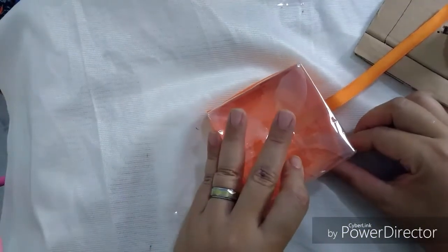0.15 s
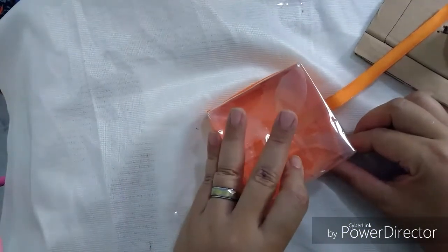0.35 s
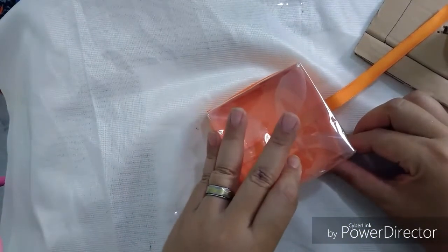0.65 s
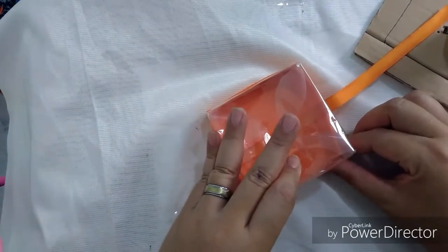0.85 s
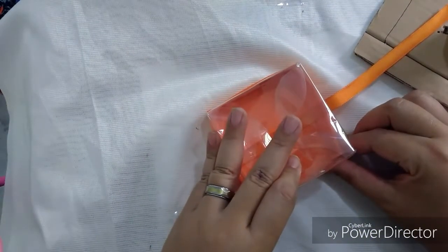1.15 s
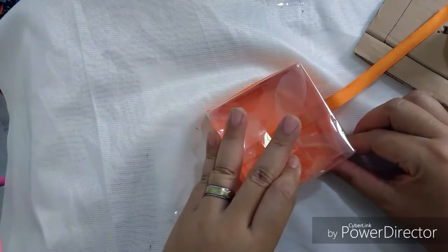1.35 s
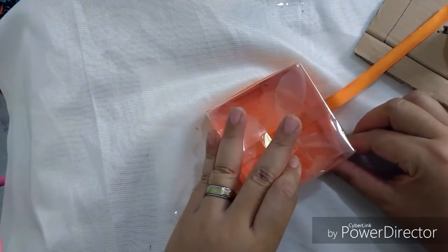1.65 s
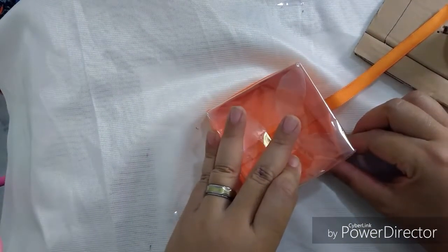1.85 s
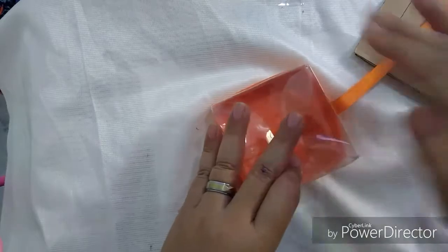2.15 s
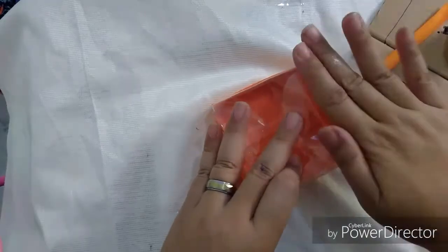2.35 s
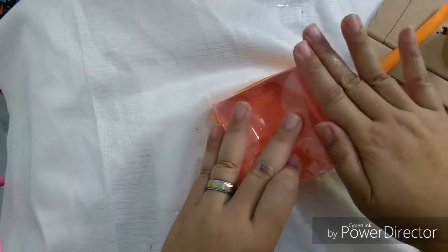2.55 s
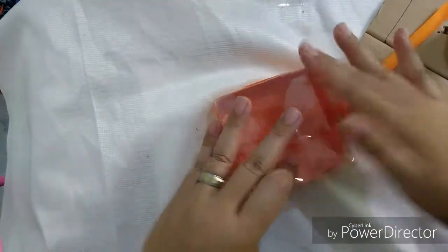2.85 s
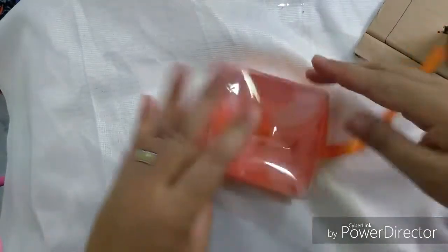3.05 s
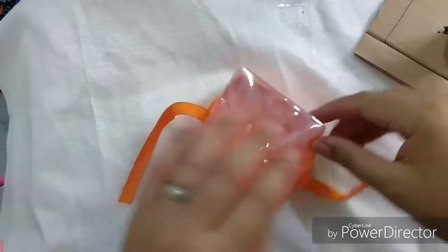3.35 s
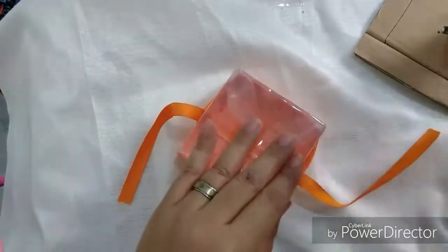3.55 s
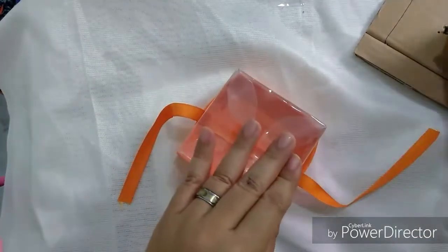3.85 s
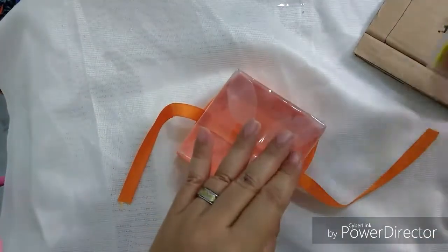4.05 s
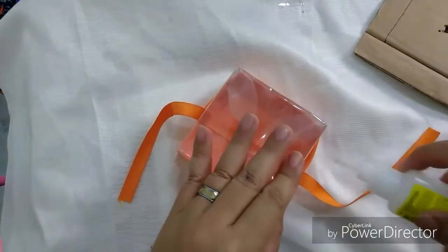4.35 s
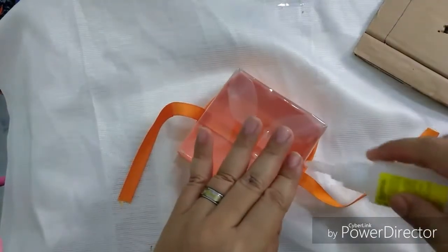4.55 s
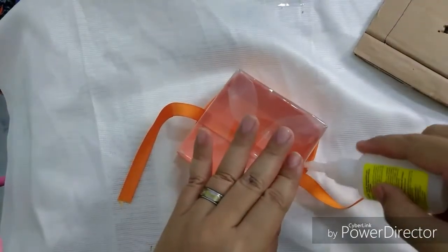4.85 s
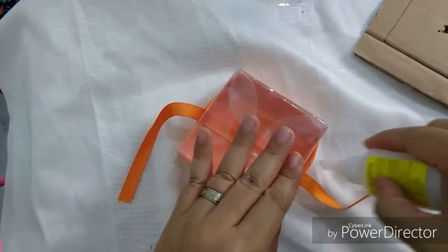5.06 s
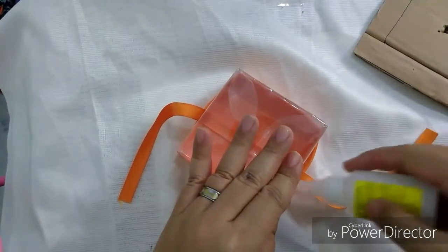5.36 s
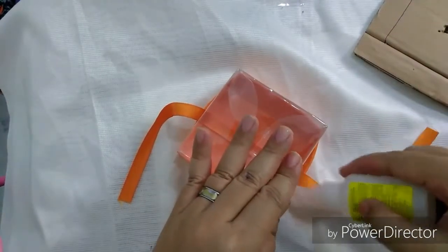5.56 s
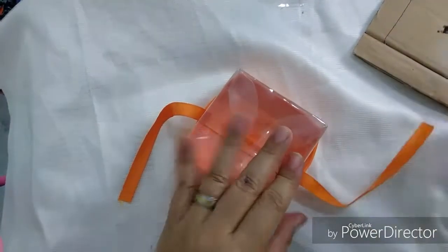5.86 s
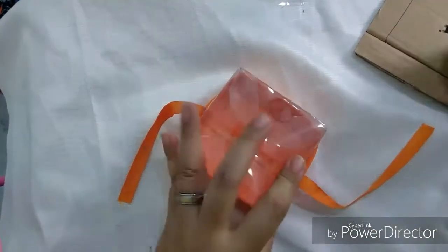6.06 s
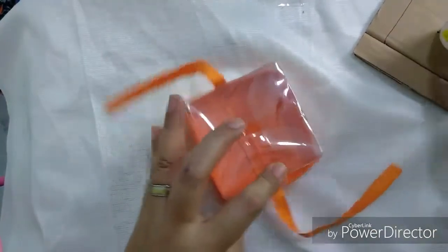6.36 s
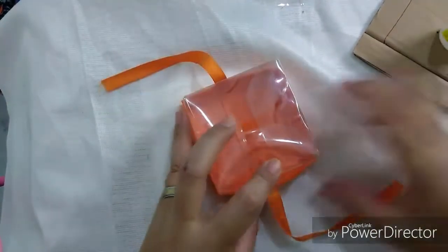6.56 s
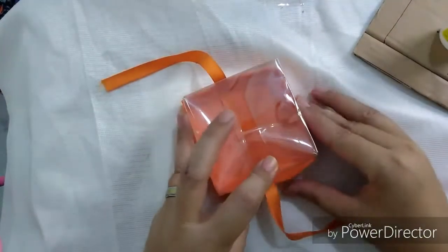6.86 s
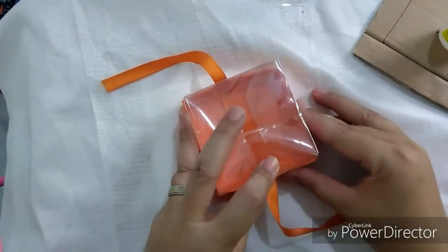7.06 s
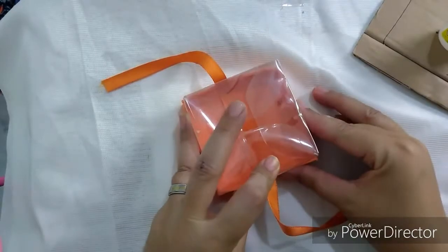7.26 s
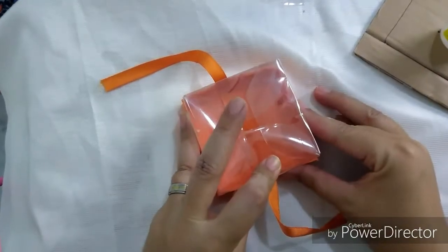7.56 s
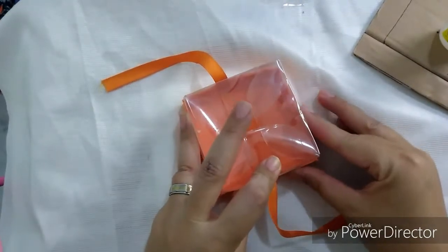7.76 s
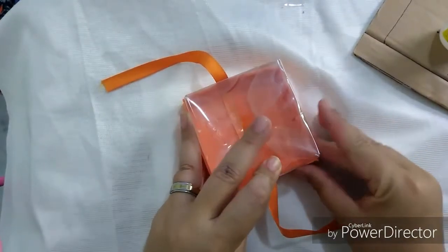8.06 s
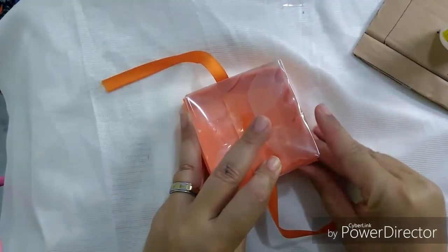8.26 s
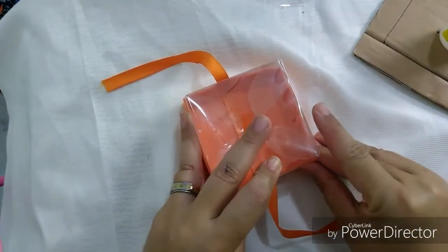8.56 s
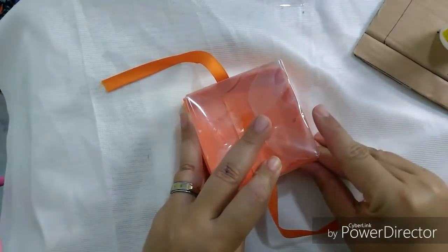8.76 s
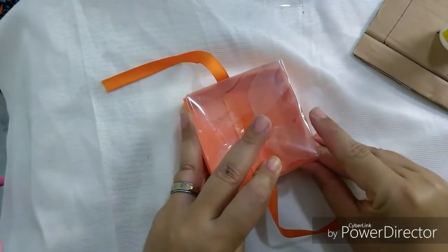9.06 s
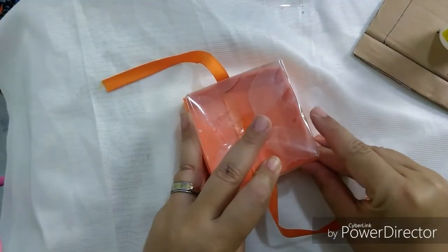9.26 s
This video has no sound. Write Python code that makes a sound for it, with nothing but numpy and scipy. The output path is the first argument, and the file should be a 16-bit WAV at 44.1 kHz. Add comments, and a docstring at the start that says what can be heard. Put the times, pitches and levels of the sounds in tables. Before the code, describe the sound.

Sharp hollow plastic pops and small crease ticks between brief hand rubs, over low room air and an engine drone swelling late.

```python
"""A thin plastic box is pressed, turned and glued on a cloth-covered table in a quiet room.
Throughout, noise makes the air, a steady tone an appliance, multiples of a firing rate an engine outside.
From the start, hands and ribbon rub as slips through resonators, walls pop as decaying modes and creases
tick as noise bursts; the hardest pops come from 2.5 to 4.4 s and at 7.8 s. Gliding noise swishes at 7.2
and 8.4 s, and the engine swells near the end. Two close capsules feed a stereo widener."""
import sys
import numpy as np
from scipy import signal
from scipy.fft import rfft, irfft, next_fast_len
from scipy.io import wavfile

SR = 44100
rng = np.random.default_rng(int(sys.argv[2]) if len(sys.argv) > 2 else 0)


def generate_wav(signal):
    """Clip the signal to [-1, 1] and save it as 16-bit WAV at the path in sys.argv[1]."""
    frames = np.transpose(np.atleast_2d(signal))
    scaled = np.clip(frames, -1, 1) * 32767
    pcm = np.round(scaled).astype(np.int16)
    wavfile.write(sys.argv[1], SR, pcm)


N = 414977


def from_db(db):
    """Turns dB into a gain."""
    return 10 ** (np.asarray(db) / 20)


def rms_one(x):
    """Scales a signal to an rms of 1."""
    return x / np.sqrt(np.mean(x ** 2) + 1e-20)


def in_time(rows):
    """Joins the rows of a timed table by lines, one curve per column."""
    s, *columns = np.transpose(rows)
    return [np.interp(np.arange(N) / SR, s, column) for column in columns]


def at_hz(points, hz):
    """Reads a curve over frequency, joined by lines on a log pitch axis."""
    points = np.array(points)
    return np.interp(np.log(hz + 1), np.log(points[:, 0]), points[:, 1])


def drift(rate):
    """Slow chance: random points of spread 1, joined by lines, `rate` points per second."""
    points = rng.standard_normal(4000)
    return np.interp(np.arange(N) * rate / SR, np.arange(len(points)), points)


def add(out, sound, s):
    """Mixes a stereo sound in at s seconds, cut off at the end of the scene."""
    at = round(s * SR)
    out[:, at:at + sound.shape[1]] += sound[:, :N - at]


# Stereo width of spread-out sound. Each row: frequency in Hz, side minus mid in dB.
SIDE_WIDTH = [(40, -7.5), (150, -7.5), (500, -4.5), (780, -6), (1200, 0.5), (16000, -0.5)]


def spread(mid, side, spectrum):
    """Colours two unrelated signals as mid and side of a stereo pair, with the mid at rms 1."""
    size = next_fast_len(len(mid))
    hz = np.arange(size // 2 + 1) * SR / size
    colour = from_db(at_hz(spectrum, hz))
    side_colour = colour * from_db(at_hz(SIDE_WIDTH, hz))
    mid = irfft(rfft(mid, size) * colour, size)[:len(mid)]
    side = irfft(rfft(side, size) * side_colour, size)[:len(mid)]
    return np.array([mid + side, mid - side]) / np.sqrt(np.mean(mid ** 2))


def uneven_slips(grain_db, lumps_db, lumps_per_s):
    """Dense slips of uneven size, coming in lumps, as two unrelated signals."""
    grain = grain_db * np.minimum(rng.exponential(1, N), 5)
    lumps = lumps_db * drift(lumps_per_s)
    return rng.standard_normal((2, N)) * from_db(grain + lumps)


# Colour of the room air. Each row: frequency in Hz, relative density in dB per Hz.
AIR_COLOUR = [(25, -9), (150, 1), (250, -1), (400, -9.5), (750, -17.5), (1600, -29.5), (3300, -32.5),
              (7000, -40), (8800, -34), (10000, -38.5), (16000, -37)]
AIR_DB = -48


def room_air():
    """The quiet room's air is low-heavy wide noise whose level wanders slowly."""
    noise = uneven_slips(grain_db=0.9, lumps_db=2.0, lumps_per_s=3.6)
    return from_db(AIR_DB) * spread(*noise, AIR_COLOUR)


# Firing rate of the engine outside. Each row: time in seconds, rate in Hz.
FIRING_RATE = [(0, 63.15), (4.3, 62.7), (7.6, 62.1), (9.41, 60.2)]
# Engine loudness. Each row: time in seconds, drone in dB, third multiple in dB.
ENGINE_LEVELS = [(0, -43.5, -77), (1.7, -57, -74), (4.01, -44.5, -58), (4.2, -58, -56), (4.37, -42.5, -57),
                 (5.2, -36.5, -59), (5.38, -47, -59), (5.57, -40.5, -55), (6.1, -43, -51),
                 (6.5, -32.5, -51), (6.73, -45.5, -50.5), (6.92, -35, -57), (7.16, -32, -50),
                 (7.51, -29, -42), (7.75, -41.5, -56), (8.07, -41, -49), (8.28, -28, -40.5),
                 (8.45, -25, -54), (8.8, -21.5, -34.5), (9.08, -27, -42.5), (9.25, -32, -37),
                 (9.41, -26, -37.5)]
# Make-up of the drone. Each row: multiple of the firing rate, level relative to the drone in dB.
DRONE_MULTIPLES = [(1, -0.5), (2, -24.5), (4, -34)]


def engine():
    """Low multiples of the firing rate come through the walls; the third swells on its own."""
    (rate_hz,) = in_time(FIRING_RATE)
    drone_db, third_db = in_time(ENGINE_LEVELS)
    turn = 2 * np.pi * np.cumsum(rate_hz) / SR
    drone = sum(from_db(drone_db + level_db) * np.sin(k * turn) for k, level_db in DRONE_MULTIPLES)
    third = from_db(third_db) * np.sin(3 * turn)
    # the drone leans left, the third multiple right
    return np.sqrt(2) * (drone * from_db([[.6], [-.6]]) + third * from_db([[-1.2], [1.2]]))


# Appliance hum. Each row: frequency in Hz, rms level in dB before waver and lean.
HUM_TONES = [(240, -49)]


def hum(waver_db=0.5, lean_db=0.8):
    """The appliance holds a steady pitch, wavering a little in level and leaning left."""
    t = np.arange(N) / SR
    tones = 0
    for hz, level_db in HUM_TONES:
        tones = tones + from_db(level_db + waver_db * drift(2)) * np.sin(2 * np.pi * hz * t)
    return np.sqrt(2) * tones * from_db([[lean_db], [-lean_db]])


def swell(s, hold_s, rise_db, fade_db):
    """Level in dB at every millisecond: rises to 0, holds and fades, both slopes in dB per second."""
    t = np.arange(0, N / SR + 1, .001) - s
    return rise_db * np.minimum(t, 0) - fade_db * np.maximum(t - hold_s, 0)


def per_sample(gain):
    """Joins a gain given at every millisecond by lines."""
    return np.interp(np.arange(N) / SR * 1000, np.arange(len(gain)), gain)


# Strokes of hands, box and ribbon on cloth. Each row: full pressure from in seconds, hold in seconds,
# hiss in dB, hollow murmur in dB, rise in dB per second, fade in dB per second.
RUBS = [(.04, 0.19, -74, -54.5, 214.5, 88), (.46, 0.2, -81, -54, 159, 70),
        (1.96, 0.018, -56, -46.5, 182, 86), (2.05, 0.011, -49.5, -51, 190, 197),
        (2.862, 0.08, -48.5, -43, 333, 150), (3.029, 0.023, -38.5, -34.5, 361, 226),
        (3.179, 0.015, -40.5, -45, 228, 278), (3.331, 0.023, -46.5, -44, 190, 216),
        (3.451, 0.092, -55.5, -45, 403, 179), (3.76, 0.0091, -49.5, -42, 900, 130),
        (3.88, 0.059, -58.5, -56.5, 300, 82), (4.085, 0.073, -54.5, -46, 901.5, 93),
        (5.1, 0.012, -59, -46.5, 452, 297), (5.62, 0.018, -64, -44.5, 328, 300),
        (5.72, 0.012, -56, -37.5, 400, 330), (5.884, 0.0084, -57, -47, 600, 200),
        (6.02, 0.12, -58.5, -54, 300, 150), (6.14, 0.053, -49, -47, 400, 100),
        (6.27, 0.16, -43, -44, 247, 243), (6.54, 0.028, -52.5, -45.5, 402, 330),
        (6.699, 0.036, -66, -54, 500, 150), (6.88, 0.013, -59.5, -46.5, 300, 160),
        (6.97, .26, -66.5, -50.5, 300, 54), (7.768, 0.082, -54, -37.5, 700, 151),
        (8.29, 0.17, -60, -50, 168, 82)]
RESTING_HISS_DB, RESTING_MURMUR_DB = -69.5, -70.5   # hands lying on the box


def strokes():
    """Each stroke raises hiss and murmur gains together above their resting levels."""
    gains = from_db([[RESTING_HISS_DB], [RESTING_MURMUR_DB]])
    for s, hold_s, hiss_db, murmur_db, rise_db, fade_db in RUBS:
        stroke_db = swell(s, hold_s, rise_db, fade_db) + [[hiss_db], [murmur_db]]
        gains = np.hypot(gains, from_db(stroke_db))     # powers add
    return map(per_sample, gains)


def patchy(spectrum, slips_per_s, patch_db, patches_per_s, **unevenness):
    """Separate slips, each ringing one of many small resonances that come and go as the grip shifts."""
    slips = uneven_slips(**unevenness)
    low_hz, high_hz = spectrum[0][0], spectrum[-1][0]
    pitches = 2 ** np.arange(np.log2(low_hz), np.log2(high_hz) + .2, 1 / 3)     # third octaves
    # each sample is dealt to one resonance; numbers past the last stay silent
    dealt = (rng.random(N) * SR / slips_per_s * len(pitches)).astype(int)
    out = 0
    for k, hz in enumerate(pitches):
        r = np.exp(-np.pi * hz / 4 / SR)    # bandwidth is a quarter of the pitch
        excitation = slips * (dealt == k) * from_db(patch_db * drift(patches_per_s)) + 1e-18
        feedback = [1, -2 * r * np.cos(2 * np.pi * hz / SR), r * r]
        out = out + signal.lfilter([1 - r * r, 0, r * r - 1], feedback, excitation)
    return spread(*out, spectrum)


# Colour of skin and ribbon hissing on cloth. Each row: frequency in Hz, relative density in dB per Hz.
HISS_COLOUR = [(500, -26), (1200, -4.5), (2300, 1.5), (3300, -3), (5000, -5.5), (7000, -10.5), (9000, -9),
               (12000, -8), (15500, -13)]


def rubbing_hiss():
    """Fine, dense slips make the bright side of rubbing."""
    return patchy(HISS_COLOUR, slips_per_s=36000, patch_db=2.0, patches_per_s=32,
                  grain_db=1.0, lumps_db=0.7, lumps_per_s=79)


# Colour of the hollow inside under rubbing. Each row: frequency in Hz, relative density in dB per Hz.
HOLLOW_COLOUR = [(150, -14), (400, 1), (600, -4), (780, 5.5), (1050, -1.5), (1500, -20), (2500, -20)]


def hollow_murmur():
    """Sparser, lumpier slips murmur in the hollow of the box."""
    return patchy(HOLLOW_COLOUR, slips_per_s=8000, patch_db=3.0, patches_per_s=27,
                  grain_db=1.8, lumps_db=3.0, lumps_per_s=70)


# Walls buckling or knocked. Each row: start in seconds, level in dB, hollow pitch in Hz,
# table thud relative to that level in dB, length of the push in seconds.
WALL_POPS = [(0.081, -37, 896, 6, 0.0025), (1.139, -44, 780, -14, 0.0027), (1.946, -30, 845, -19, 0.0041),
             (1.959, -22.5, 860, -4, 0.0012), (1.978, -32, 807, -30, 0.0018),
             (2.051, -35.5, 920, -9, 0.0018), (2.299, -22, 790, -24, 0.0018),
             (2.509, -7.5, 739, -17.5, 0.0018), (2.513, -15, 900, -11.5, 0.0013),
             (2.6027, -5, 781, -23, 0.0042), (2.603, -15.5, 444, -28, .003), (2.921, -27, 870, -16, 0.0083),
             (2.926, -21.5, 475, -17, 0.0052), (3.023, -18, 752, -11.5, 0.0059),
             (3.036, -18.5, 840, -20, 0.0018), (3.039, -22, 920, -17, 0.0022),
             (3.464, -23, 942, -6, 0.0057), (3.503, -24.5, 673, -6, 0.0065), (3.736, -13, 777, -28, 0.0047),
             (3.747, -11, 757, -3, 0.0041), (4.069, -9.5, 930, -12, 0.0022),
             (4.072, -14.5, 720, -15.5, 0.0015), (4.083, -25.5, 1060, -11, 0.0021),
             (4.369, -17.5, 780, -9, 0.0024), (4.411, -21.5, 781, -15, 0.007),
             (4.618, -26, 810, -28, 0.0031), (4.688, -36, 760, -24, 0.0021),
             (4.735, -39.5, 756, -11, 0.0031), (5.107, -34.5, 810, -16, 0.0025),
             (5.405, -24, 805, -31, 0.0027), (5.628, -30, 743, -25, 0.0063),
             (5.712, -27.5, 785, -5, 0.0025), (5.721, -22, 924, 4, 0.0036), (5.887, -36, 745, -18, 0.0033),
             (6.006, -23, 743, -2, 0.0017), (6.212, -36.5, 1000, 5, 0.0017), (6.308, -37, 973, -14, 0.0092),
             (6.406, -29, 764, -20, 0.0052), (6.667, -30, 716, 1, 0.0072), (6.983, -38, 800, -20, 0.0054),
             (7.037, -38, 850, -14, 0.011), (7.079, -32, 884, -9, 0.011), (7.225, -33, 1106, -23, 0.0091),
             (7.746, -25.5, 790, -29, 0.002), (7.805, -4.5, 794, -30, .0015)]
# Modes of the box. Each row: ratio to the hollow pitch, relative level in dB, share of the ring's T60.
BOX_MODES = [(1, 0.5, 1), (1.176, -7, 0.4), (0.6, -10.5, 0.62), (0.454, -18.5, 1), (1.56, -21.5, 0.13),
             (2.317, -26.5, 0.81), (2.62, -24, 0.14)]
RING_T60_S = 0.017


def pops(lag_s=.00008, thud_hz=190, thud_t60=0.019, chance_db=3.0, detune=0.039, lean_db=-1.8):
    """A push rings the box's modes, bent differently each time, and thuds into the table."""
    out = np.zeros((2, N))
    luck = rng.standard_normal((len(WALL_POPS), len(BOX_MODES), 2))
    t = np.maximum(np.arange(4000) / SR - np.array([[0], [lag_s]]), 0)     # right capsule hears it later
    for (s, level_db, hz, thud_db, push_s), row in zip(WALL_POPS, luck):
        free = np.maximum(t - push_s, 0)      # the ring grows under the push and dies after it
        ring = from_db(thud_db - 60 * free / thud_t60) * np.sin(2 * np.pi * thud_hz * t)
        for (ratio, mode_db, share), (chance, bend) in zip(BOX_MODES, row):
            varies = ratio != 1               # the main mode keeps its pitch and level
            decay_db = 60 * free / (RING_T60_S * share)
            gain = from_db(mode_db + chance_db * chance * varies - decay_db)
            mode_hz = hz * ratio * (1 + detune * bend * varies)
            ring = ring + gain * np.sin(2 * np.pi * mode_hz * t)
        push = np.sin(np.pi / 2 * np.minimum(t / push_s, 1))
        add(out, from_db(level_db) * push * ring * from_db([[lean_db], [-lean_db]]), s)
    return out


# Creases and ribbon ticking. Each row: start in seconds, level in dB, dullness in dB per octave.
CREASE_TICKS = [(0.0826, -32.5, 8), (0.169, -39.5, -1), (1.862, -49.5, 11), (1.976, -29, 4),
                (2.051, -30, 3), (2.2956, -29, 6.5), (2.919, -24.5, 4.5), (2.968, -36, 2),
                (3.026, -19.5, 6.5), (3.466, -25, 4.5), (3.745, -19, 6), (3.881, -33, 4.5),
                (4.07, -29.5, 13.5), (4.152, -35.5, -9), (4.41, -42, 9.5), (5.097, -39, 4),
                (5.6272, -39.5, 6), (5.723, -25.5, 3.5), (5.902, -33.5, -11), (5.935, -35.5, 0),
                (5.971, -37, -2), (6.0042, -27.5, 6), (6.1299, -33, 6), (6.53, -37, 5), (6.847, -37, -11),
                (6.93, -32, -11), (7.117, -41.5, 8.5), (7.19, -50.5, 11.5), (7.806, -38.5, 14),
                (8.302, -35.5, -3)]
TICK_T60_S, TICK_RISE_S = 0.022, 0.0025     # T60 at zero dullness
DULL_DB_DOUBLES_TICK = 18.5                 # duller ticks last longer


def ticks():
    """Each tick is a burst of tiny slips that dies at once, tilted by its dullness."""
    out = np.zeros((2, N))
    t = np.arange(2048) / SR
    noise = rng.standard_normal((len(CREASE_TICKS), 2, len(t)))
    hz = np.arange(len(t) + 1) * SR / 2 / len(t)
    low_cut_db = 8.1 * np.log2(np.maximum(1500 / (hz + 1), 1))
    for (s, level_db, dull_db), burst in zip(CREASE_TICKS, noise):
        tilt_db = dull_db * np.log2(np.maximum(hz, 1500) / 6000)
        burst = irfft(rfft(burst, 2 * len(t)) * from_db(-tilt_db - low_cut_db))[:, :len(t)]
        t60_s = TICK_T60_S * 2 ** (dull_db / DULL_DB_DOUBLES_TICK)
        rise = np.minimum(t / TICK_RISE_S, 1)
        add(out, from_db(level_db - 60 * t / t60_s) * rise * burst, s)
    return out


# Decay of the room. Each row: frequency in Hz, T60 in seconds.
ROOM_DECAY = [(100, 0.23), (800, 0.43), (12000, 0.27)]
# Colour of the echoes. Each row: frequency in Hz, relative level in dB.
ECHO_COLOUR = [(450, -0.5), (780, -9.5), (1100, 3), (1600, -1.5), (4000, 0.5)]
ROOM_DB, ROOM_GAP_S = -7.5, 0.0045      # echoes fade in around the end of the gap


def room(x):
    """Echoes are noise that dies octave by octave, after a short gap."""
    t = np.arange(SR // 2) / SR
    white, tail = rng.standard_normal((2, len(t))), 0
    for hz in 90 * 2. ** np.arange(8):
        band = signal.butter(2, [hz / np.sqrt(2), hz * np.sqrt(2)], "band", fs=SR, output="sos")
        tail = tail + signal.sosfilt(band, white) * from_db(-60 * t / at_hz(ROOM_DECAY, hz))
    tail = tail * np.clip(t / ROOM_GAP_S - .5, 0, 1)
    tail = spread(*tail, ECHO_COLOUR) / np.sqrt(len(t))
    return signal.fftconvolve(tail, x.mean(axis=0, keepdims=True))[:, :N]


# Skin sliding with a narrow swish. Each row: loudest at in seconds, level there in dB, centre there in Hz,
# glide in Hz per second, rise in dB per second, fade in dB per second.
SKIN_SWISHES = [(7.262, -47, 1170, 300, 300, 280), (7.229, -46, 2630, 1, 600, 248),
                (7.24, -54, 4576, -2, 500, 200), (8.371, -55, 1750, -3000, 500, 150),
                (8.41, -56, 3390, 1, 250, 300), (8.431, -50, 1414, -1500, 300, 33)]


def swishes(width_hz=250):
    """Sliding skin makes noise in a narrow band whose centre glides."""
    out = np.zeros((2, N))
    t = np.arange(-.2 * SR, .6 * SR) / SR      # zero at the loudest moment
    band = signal.butter(2, width_hz / 2, fs=SR, output="sos")
    for s, level_db, hz, glide, rise_db, fade_db in SKIN_SWISHES:
        slow = rms_one(signal.sosfilt(band, rng.standard_normal((2, 2, len(t)))))
        turn = 2 * np.pi * (hz * t + glide * t ** 2 / 2)
        gain = from_db(level_db + rise_db * np.minimum(t, 0) - fade_db * np.maximum(t, 0))
        add(out, gain * (slow[0] * np.cos(turn) + slow[1] * np.sin(turn)), s + t[0])
    return out


def scene():
    """Mixes box, hands, room and street; only pops and ticks feed the echoes."""
    background = room_air() + engine() + hum()
    hiss_gain, murmur_gain = strokes()
    rubbing = hiss_gain * rubbing_hiss() + murmur_gain * hollow_murmur()
    hits = pops() + ticks()
    return background + rubbing + hits + from_db(ROOM_DB) * room(hits) + swishes()


CROSS_GAIN, CROSS_LAG_S = 0.94, 0.0003815
CROSS_DULL = 0.57       # one-pole lowpass feedback
CUTOFF_HZ = 15500


def record(dry):
    """The widener subtracts the other side, delayed and dulled; peaks are rounded and the top is cut."""
    size = next_fast_len(N + 999)
    turn = 2 * np.pi * np.arange(size // 2 + 1) / size
    delay = np.exp(-1j * turn * CROSS_LAG_S * SR)
    dulling = (1 - CROSS_DULL) / (1 - CROSS_DULL * np.exp(-1j * turn))
    other_side = irfft(rfft(dry[::-1], size) * CROSS_GAIN * delay * dulling, size)[:, :N]
    wide = dry - other_side
    rounded = wide / (1.15 * np.abs(wide) ** 4 + 1) ** .25
    return signal.sosfilt(signal.ellip(8, 1, 60, CUTOFF_HZ, fs=SR, output="sos"), rounded)


dry = scene()
out = record(dry)
generate_wav(out)
```